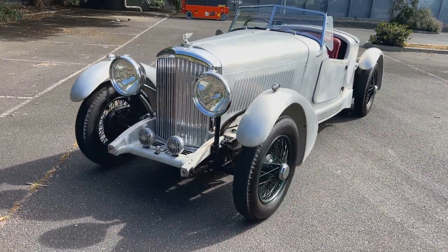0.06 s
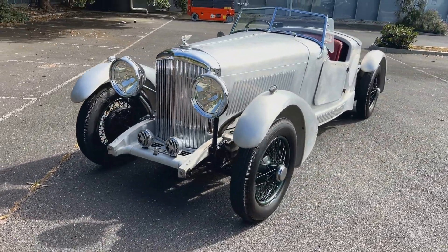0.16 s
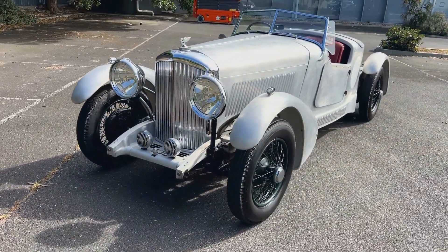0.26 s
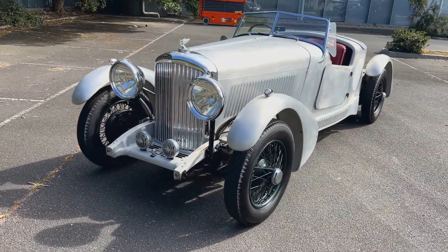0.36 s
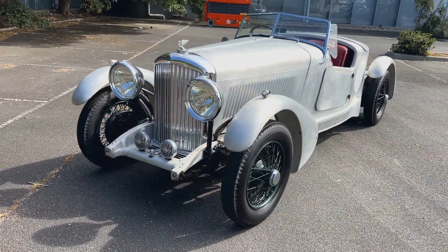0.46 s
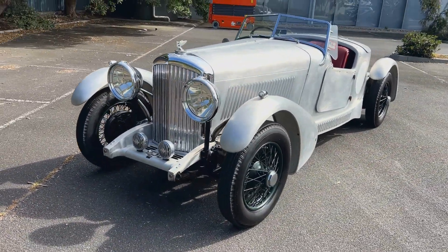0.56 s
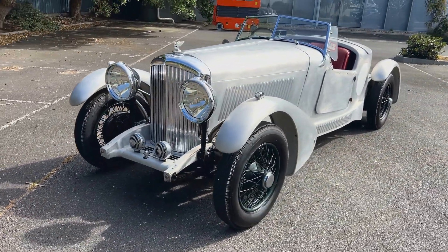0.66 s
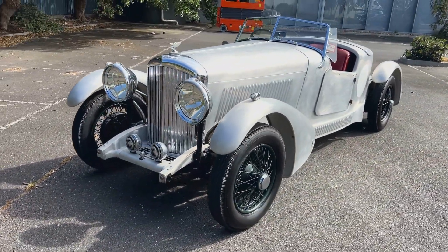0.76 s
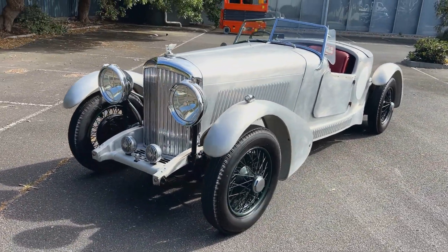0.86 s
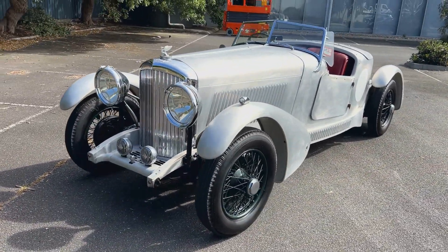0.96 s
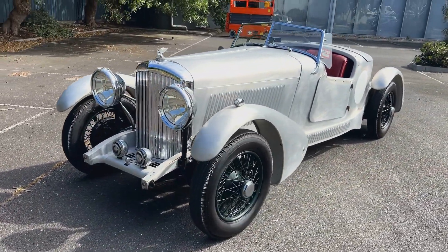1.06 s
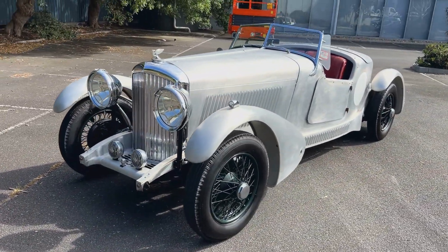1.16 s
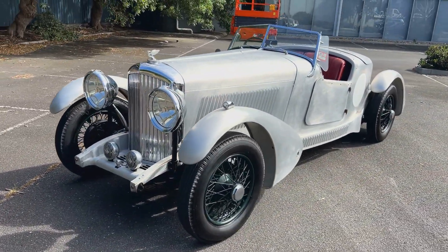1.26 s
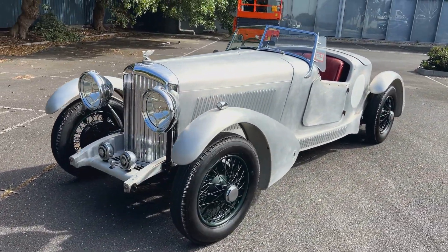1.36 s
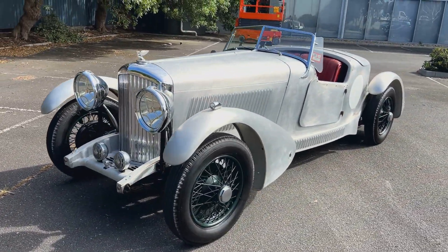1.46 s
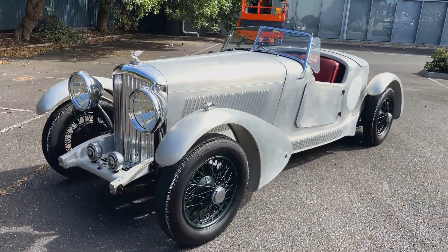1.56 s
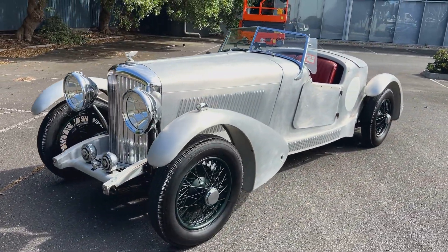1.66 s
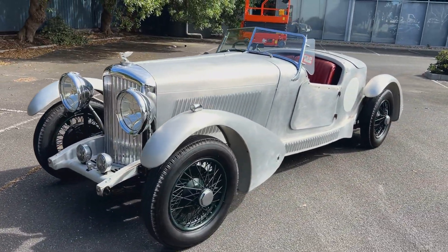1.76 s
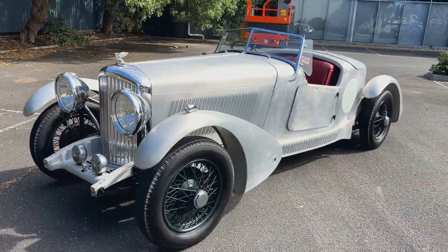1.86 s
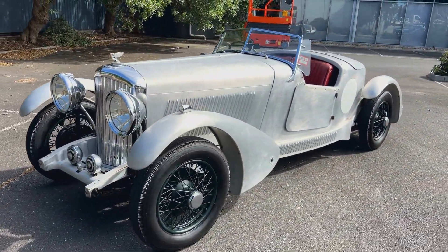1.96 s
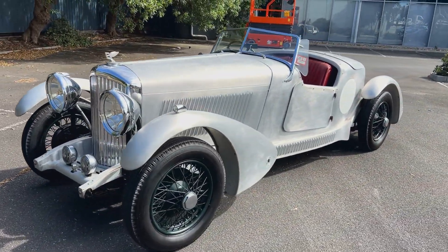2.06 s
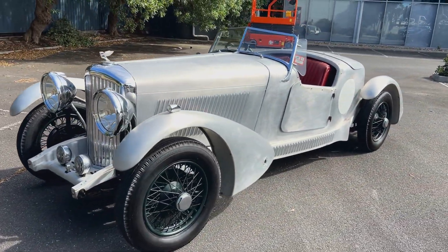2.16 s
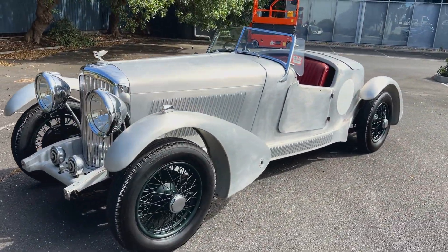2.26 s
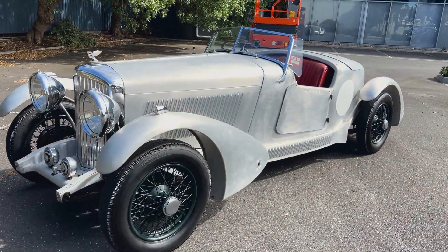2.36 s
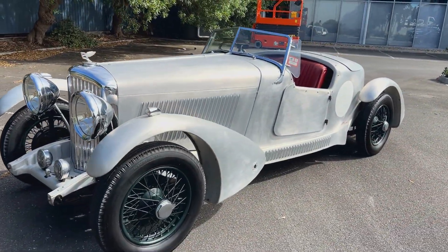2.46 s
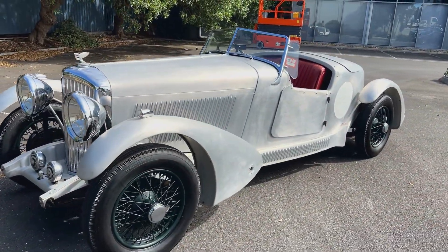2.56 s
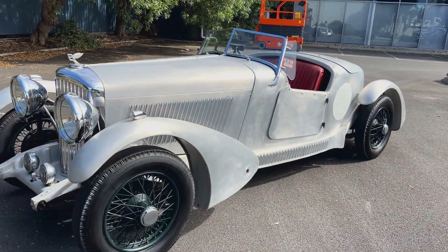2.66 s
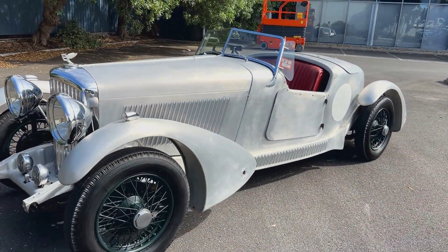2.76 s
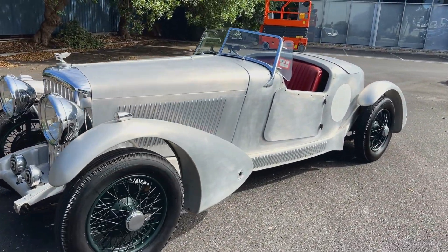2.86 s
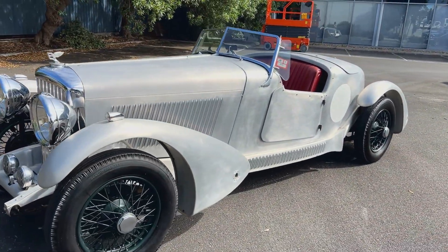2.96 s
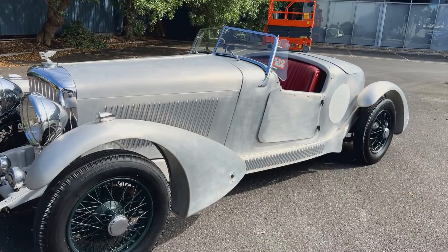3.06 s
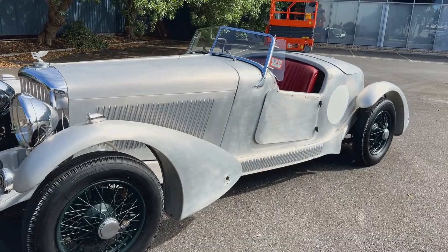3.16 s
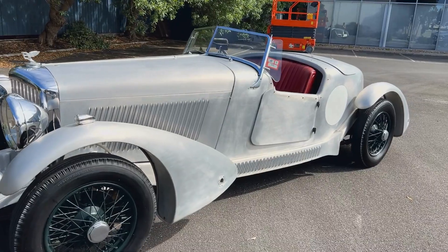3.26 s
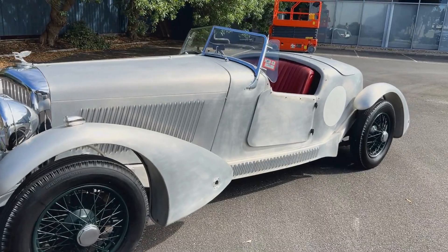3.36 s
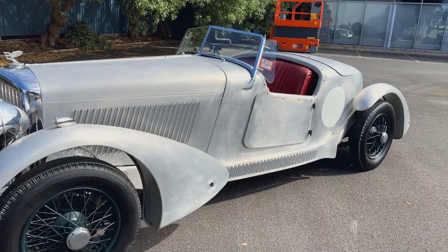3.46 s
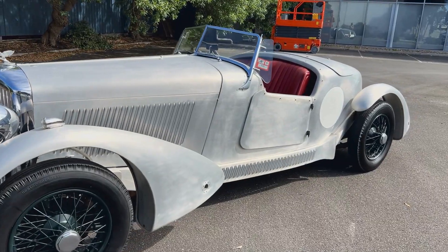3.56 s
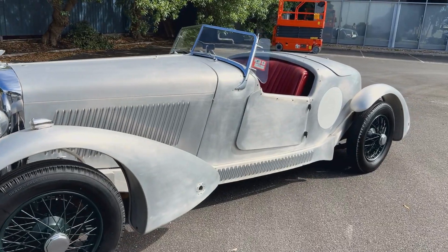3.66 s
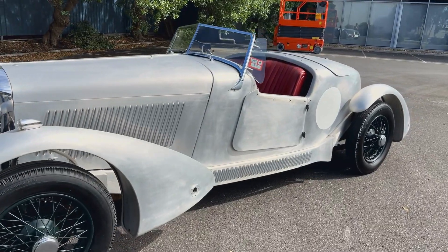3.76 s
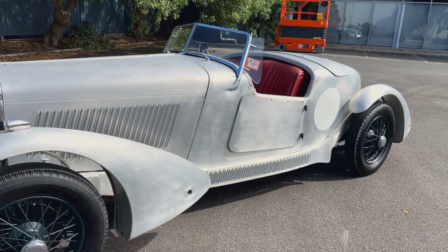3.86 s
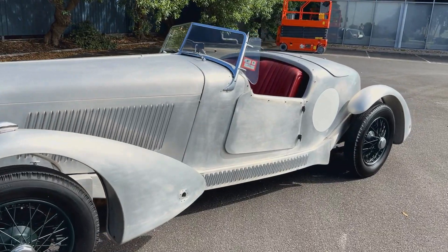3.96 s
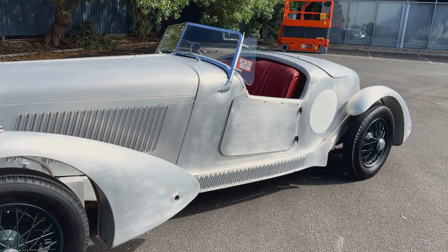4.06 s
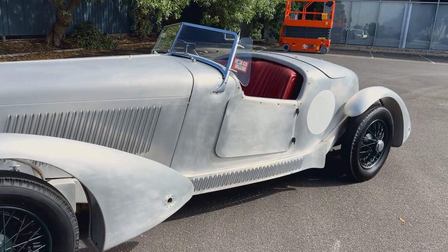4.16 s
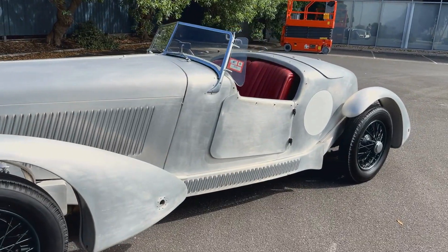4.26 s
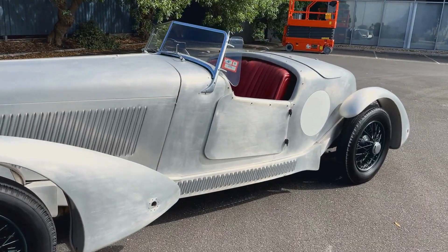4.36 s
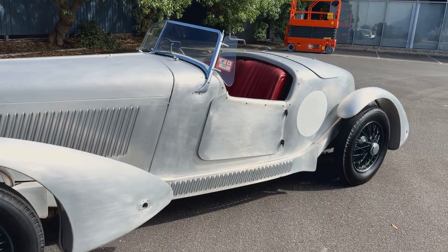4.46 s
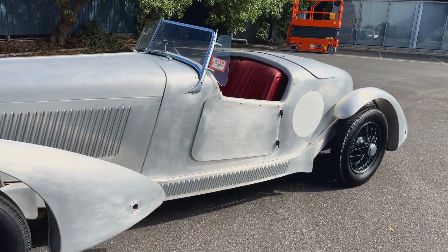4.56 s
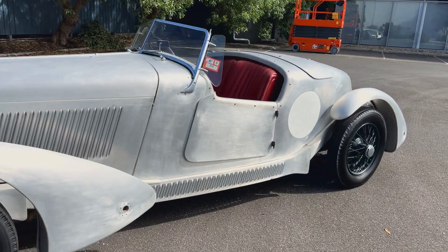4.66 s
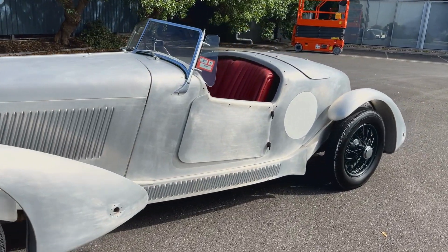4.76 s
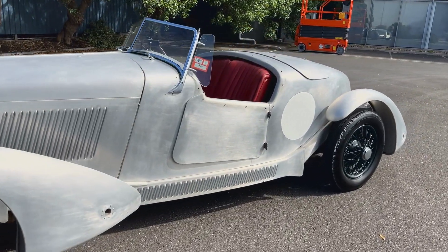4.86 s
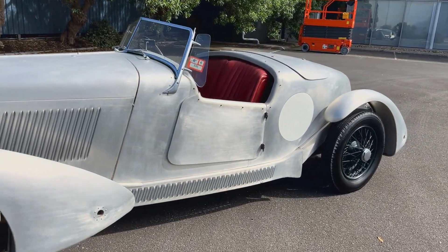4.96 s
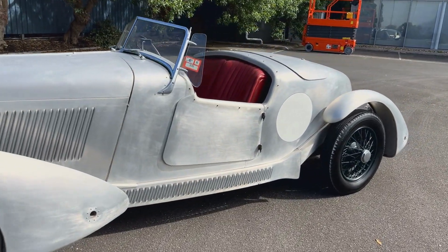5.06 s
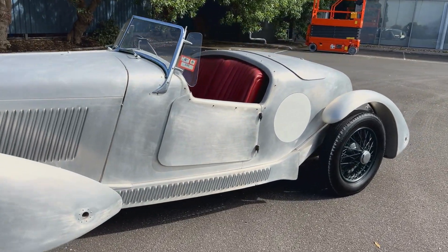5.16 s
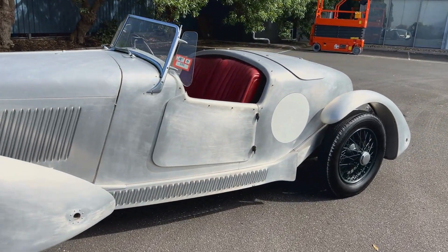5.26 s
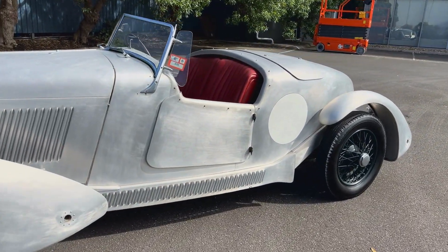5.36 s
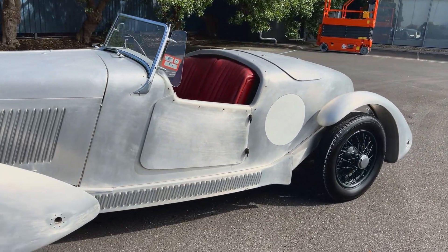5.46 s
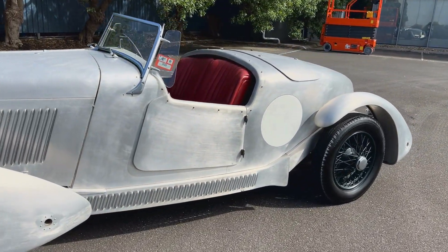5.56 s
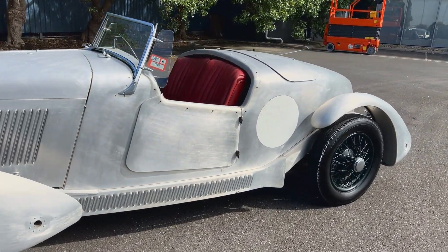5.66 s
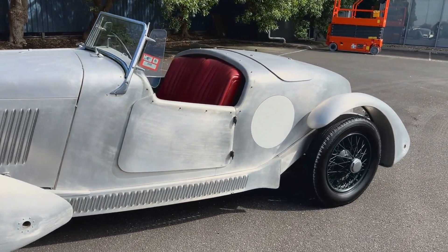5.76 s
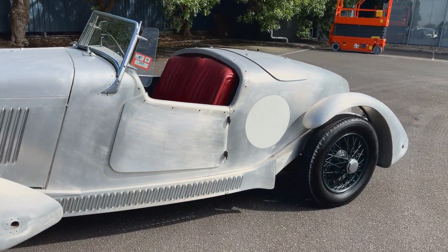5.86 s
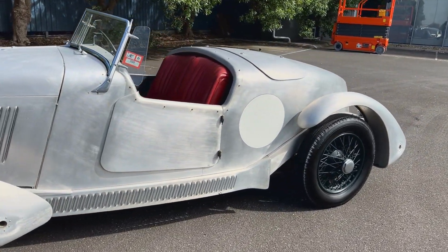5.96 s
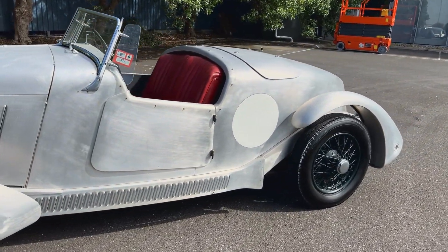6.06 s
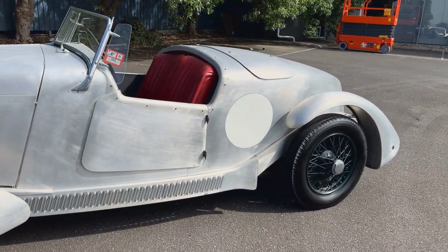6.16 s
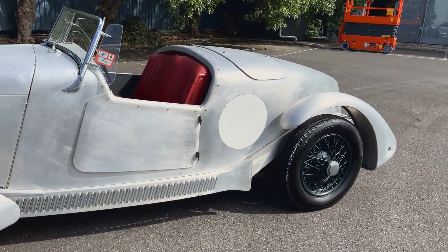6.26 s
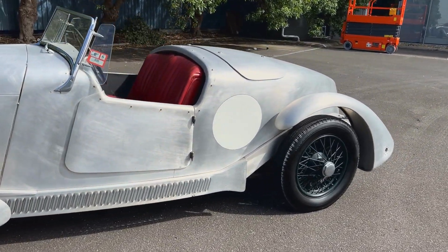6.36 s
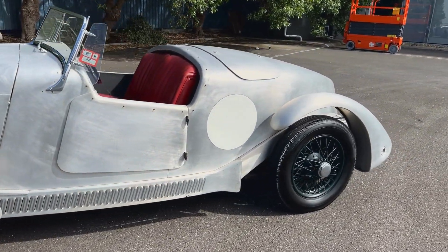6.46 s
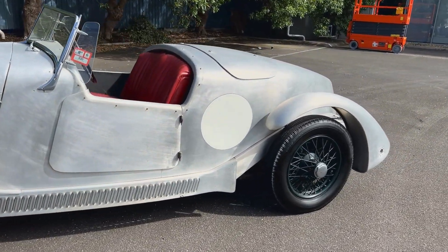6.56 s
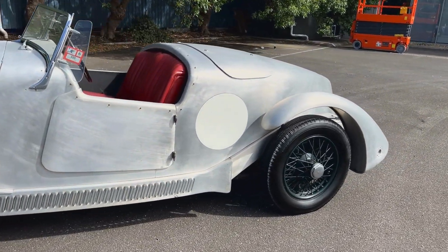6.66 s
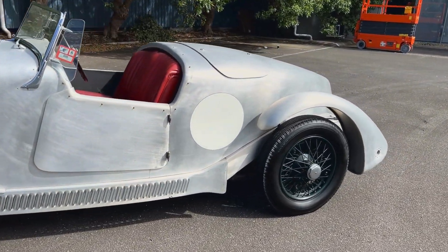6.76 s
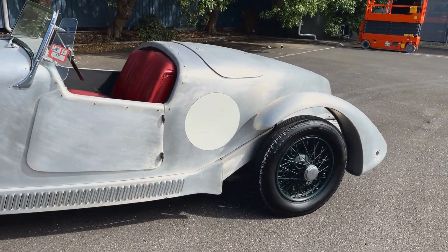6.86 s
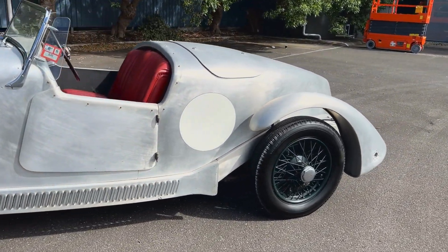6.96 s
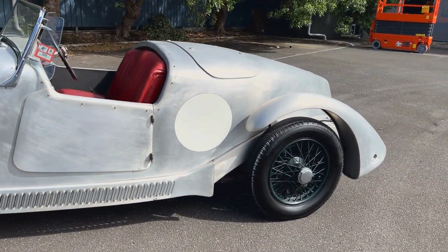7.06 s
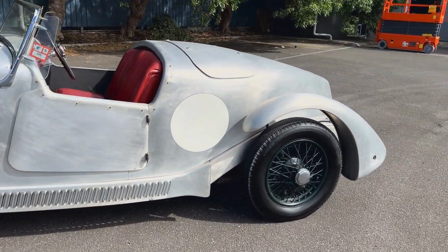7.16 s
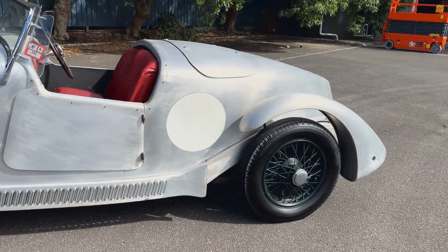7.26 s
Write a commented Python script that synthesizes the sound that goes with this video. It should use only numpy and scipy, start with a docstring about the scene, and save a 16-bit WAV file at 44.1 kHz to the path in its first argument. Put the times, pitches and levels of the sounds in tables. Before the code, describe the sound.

A large old car engine idles with a deep steady boom and light valve clatter, growing louder as it comes closer.

```python
"""An old straight-six idling in an open car park

The listener walks from the radiator towards the tail. The exhaust booms on the third harmonic of
the firing rate and now and then coughs; gas rumbles from the tailpipe and the idle hunts a little.
The valve gear clatters under the bonnet, and a small bird chirps, answered by the walls around."""
import sys
import numpy as np
from scipy import signal
from scipy.fft import rfft, irfft, next_fast_len
from scipy.io import wavfile
from scipy.ndimage import map_coordinates

SR = 44100
rng = np.random.default_rng(int(sys.argv[2]) if len(sys.argv) > 2 else 0)


def waveform_to_disk(signal):
    """Save audio, clipped to [-1, 1], as 16-bit WAV at the path in sys.argv[1]."""
    frames = np.transpose(np.atleast_2d(signal))
    scaled = np.clip(frames, -1, 1) * 32767
    samples = np.round(scaled).astype(np.int16)
    wavfile.write(sys.argv[1], SR, samples)


N = 322371
TIME = np.arange(N) / SR


def amp(db):
    """Amplitude ratio of a level in decibels."""
    return 10 ** (np.asarray(db) / 20)


def unit(x):
    """Normalisation to rms 1."""
    return x / np.sqrt(np.mean(x ** 2) + 1e-20)


def along(points, hz):
    """Interpolation of (frequency, value) points on a logarithmic frequency axis."""
    knots_hz, values = np.transpose(points)
    return np.interp(np.log(hz + 1), np.log(knots_hz + 1), values)


def curve(points):
    """Linear interpolation of (time, value) points at every sample."""
    return np.interp(TIME, *np.transpose(points))


def wobble(rate):
    """Smooth random modulation: a spline through `rate` Gaussian values a second."""
    return map_coordinates(rng.standard_normal(int(N * rate / SR) + 4), [TIME * rate])


def swells(events, sigma_s):
    """A Gaussian rise in level around each (time, level) event."""
    return sum(db * np.exp(-.5 * ((TIME - s) / sigma_s) ** 2) for s, db in events)


def filtered(x, response):
    """Linear filtering: the spectrum is multiplied by a frequency response."""
    size = next_fast_len(N + SR // 2)
    return irfft(rfft(x, size) * response(np.fft.rfftfreq(size, 1 / SR)), size)[..., :N]


def rush(spectrum, coherence):
    """Coloured stereo noise of rms 1; the ratio of mid to side sets its coherence."""
    def colour(hz):
        angle = np.arccos(np.clip(along(coherence, hz), -1, 1)) / 2
        return amp(along(spectrum, hz)) * np.array([np.cos(angle), np.sin(angle)])
    mid, side = filtered(rng.standard_normal((2, N)), colour)
    return unit(np.array([mid + side, mid - side]))


# Spectrum of the ambient noise: (frequency [Hz], relative density [dB])
AIR_SPECTRUM = [(15, -37.5), (45, -9.5), (100, -2), (300, -1), (600, -16.5), (1500, -17.5), (4000, -32),
                (9000, -39), (15000, -50.5)]

def air():
    """Ambient noise: the steady hush of the car park."""
    return amp(-57) * rush(AIR_SPECTRUM, coherence=[(100, 0.76), (2000, 1.0)])


# Chirps: (time [s], level [dB], duration [s], start pitch [Hz], end pitch [Hz], sub-octave level [dB])
CHIRPS = [(0.12, -53.5, 0.042, 4440, 6640, -2.5), (5.98, -42, 0.04, 4840, 6580, -2.5),
          (6.326, -49, 0.016, 3300, 3500, -38), (6.331, -53.5, 0.026, 4320, 4100, -25),
          (6.545, -54.5, .025, 3880, 4050, -30)]

def bird(echo_db=-2, t60_s=0.37, fifth_db=-21, octave_db=-27, spread=0.2):
    """Frequency modulation: quick sweeps level off, and scattering by walls and trees adds a tail."""
    song = np.zeros(N)
    for s, db, length_s, start_hz, end_hz, sub_db in CHIRPS:
        progress = np.clip((TIME - s) / length_s, 0, 1)
        sweep = np.minimum(progress / .8, 1) ** 1.3
        hz = (start_hz + (end_hz - start_hz) * sweep) * amp(0.25 * wobble(700))
        phase = 2 * np.pi * np.cumsum(hz) / SR
        envelope = np.abs(np.sin(np.pi * progress ** 1.24)) ** .5
        for ratio, partial_db in [(1, 0), (.5, sub_db), (1.5, fifth_db), (2, octave_db)]:
            song += amp(db + partial_db) * envelope * np.sin(ratio * phase)
    t = TIME[:SR // 2]
    ahead = rng.standard_normal(len(t))  # most of the echo is common to both ears
    scatter = ahead + spread * rng.standard_normal((2, len(t)))
    tail = scatter * amp(-60 * t / t60_s) * (1 - np.exp(-t / 0.0021))
    echoes = signal.fftconvolve(song[None], tail / np.linalg.norm(tail[0]), axes=1)[:, :N]
    return song + amp(echo_db) * echoes


# The listener's walk: (time [s], distance from the car's rear half [m])
WALK = [(0, 6.9), (1.1, 5.05), (2.6, 3.87), (3.6, 2.98), (4.2, 2.375), (5.2, 1.89), (6.2, 1.635),
        (7.3, 1.47)]

def nearing(db_at_2m, db_per_doubling):
    """Distance law: the level along the walk, falling equally with each doubling of distance."""
    return db_at_2m - db_per_doubling * np.log2(curve(WALK) / 2)


def blows(firings, offset, pattern_db, scatter_db, jitter_s):
    """Quasi-periodic impulse train: one uneven blow per firing, delayed by `offset` of a period."""
    count = np.arange(int(firings[-1]))
    size, shift = np.clip(rng.standard_normal((len(count), 2)), -2.5, 2.5).T
    times = np.interp(count + offset, firings, TIME) + jitter_s * shift
    strengths = amp(np.take(pattern_db, count, mode="wrap") + scatter_db * size)
    return np.bincount(np.clip(times * SR, 0, N - 1).astype(int), strengths, N)


def bursts(hits, rise_s, decay_s):
    """Incoherent addition: an envelope of rms 1 in which the bursts after each impulse add in power."""
    t = TIME[:SR // 8]
    shape = (1 - np.exp(-t / rise_s)) * np.exp(-t / decay_s)
    return unit(np.sqrt(np.abs(signal.fftconvolve(hits ** 2, shape ** 2)[:N])))


# Valve clatter of each cylinder in firing order: (relative level [dB])
CYLINDERS = [-9, 0.5, 3.5, 2.5, 4, 2.5]
# Spectra of the clatter and the hiss: (frequency [Hz], relative density [dB])
CLATTER_SPECTRUM = [(500, -21), (1000, -4), (1650, -6), (2000, -5.5), (2350, 2.5), (2650, -0.5),
                    (3050, -2.5), (3500, -7), (4200, -7.5), (5000, -14), (6500, -17), (9000, -34.5),
                    (15000, -47)]
HISS_SPECTRUM = [(2500, -14.5), (4500, -7.5), (6500, -1.5), (7800, 4.5), (8700, 1.5), (9500, -8.5),
                 (10200, -21.5), (11300, -2.5), (13000, -14), (15500, -13.5)]
# Left-right likeness of the engine's noise: (frequency [Hz], coherence [0-1])
ENGINE_COHERENCE = [(50, .97), (130, .6), (300, .7), (700, .62), (1400, .82), (2500, .98), (6000, .96),
                    (12000, .8)]
# Resonances of the castings and bonnet: (frequency [Hz], bandwidth [Hz], lift [dB])
CASTING_MODES = [(1630, 36, 0.5), (1676, 27, 7.5), (2380, 64, 2.5), (2965, 130, 2.5)]
# Tones of a faint whine: (frequency [Hz], level relative to the hiss [dB])
WHINE_TONES = [(9500, -17), (9701, -16.5)]

def valve_gear(firings):
    """Impact noise: clatter and tappet ticks ring the castings, over a pulsing hiss and a thin whine."""
    def castings(hz):
        return amp(sum(db / (1 + (2 * (hz - mode) / width) ** 2) for mode, width, db in CASTING_MODES))
    valves = blows(firings, offset=.12, pattern_db=CYLINDERS, scatter_db=1.3, jitter_s=.001)
    tappets = blows(firings, offset=.25, pattern_db=CYLINDERS, scatter_db=2.8, jitter_s=.002)
    swell = bursts(valves, rise_s=.005, decay_s=.011)
    ticks = amp(-11) * bursts(tappets, rise_s=.0006, decay_s=.004)
    beat = unit(np.sqrt(swell ** 2 + ticks ** 2 + amp(-2) ** 2))  # power sum with a steady floor
    impacts = beat * rush(CLATTER_SPECTRUM, ENGINE_COHERENCE)
    clatter = amp(nearing(db_at_2m=-54.5, db_per_doubling=6.76)) * unit(filtered(impacts, castings))
    hiss_db = nearing(db_at_2m=-64.5, db_per_doubling=12.5)
    hiss = amp(hiss_db + wobble(14)) * unit(beat + amp(-4.5)) * rush(HISS_SPECTRUM, ENGINE_COHERENCE)
    whine = sum(amp(hiss_db + db + 2.2 * wobble(15)) * np.sqrt(2) * np.sin(2 * np.pi * hz * TIME)
                for hz, db in WHINE_TONES)
    return clatter + hiss + whine


# Spectrum of the tailpipe's rumble: (frequency [Hz], relative density [dB])
RUMBLE_SPECTRUM = [(15, -45), (25, -20.5), (35, -10), (52, 3.5), (75, 2), (120, 0), (250, -26.5),
                   (600, -59), (3000, -120)]
# Deep chuffs of gas: (time [s], rise above the rumble [dB])
CHUFFS = [(2.79, 10), (3.05, 15), (3.22, 3), (5.03, 2), (6.17, 4.5), (6.7, 8), (6.89, 10), (7.03, 7.5)]

def rumble():
    """Flow noise: gas leaves the tailpipe in low lumps, now and then in a stronger chuff."""
    level_db = nearing(db_at_2m=-34.5, db_per_doubling=12.3) + swells(CHUFFS, sigma_s=0.044) + wobble(14)
    return amp(level_db) * rush(RUMBLE_SPECTRUM, coherence=[(40, 0.88), (80, 0.82), (160, 1.0)])


# Exhaust coughs: (time [s], level [dB], start pitch [Hz])
COUGHS = [(3.036, -26, 380), (5.198, -30, 440), (5.235, -24, 450), (5.615, -32, 280), (5.824, -31, 280),
          (6.531, -29, 320), (6.810, -14, 520), (6.978, -24, 320), (7.060, -22, 500)]

def coughs(sag=.25, peak_cycles=2.4):
    """Damped transient: an uneven firing pushes out a pop whose pitch sags as the gas slows."""
    pops, t = np.zeros(N + SR), TIME[:SR // 8]
    for s, db, start_hz in COUGHS:
        cycles = t * start_hz
        phase = 2 * np.pi * np.log1p(sag * cycles) / sag
        age = cycles / peak_cycles
        envelope = age * np.exp(1 - age) * (1 - np.exp(-2 * cycles))
        pops[round(s * SR):][:len(t)] -= amp(db) * envelope * np.sin(phase)
    return pops[:N]


# Exhaust resonances above the boom: (frequency [Hz], bandwidth [Hz],
# relative level by the radiator [dB], by the front wheel [dB], by the door [dB])
PIPE_MODES = [(127.4, 14, -5, -5.5, -4), (163, 14, -5.5, -5, -5), (202.5, 18, -5, -10, 3.5),
              (263.8, 18.4, -11, -6, -8), (301.3, 15.7, -8, -8.5, -10.5), (371, 45, -16, -19, -16),
              (442.7, 46, -32.5, -18.5, -19.5), (531, 33, -28.5, -23, -27.5)]
# Spectrum of the gas puffs: (frequency [Hz], relative density [dB])
PUFF_SPECTRUM = [(30, -45.5), (70, -12.5), (120, 3), (230, -1), (310, -5), (400, -15.5), (540, -13.5),
                 (680, -20), (900, -19), (1050, -28), (1800, -29.5), (3500, -60), (9000, -120)]

def exhaust(firings):
    """Impulse excitation: each firing rings the pipe's damped modes and lets out a puff of gas."""
    pulses = blows(firings, offset=.85, pattern_db=[0], scatter_db=1.5, jitter_s=.0001)
    pipe_db = nearing(db_at_2m=-36.5, db_per_doubling=7.15)
    modes, t = np.zeros(N), TIME[:SR // 4]
    for hz, width_hz, *place_db in PIPE_MODES:
        ring = np.sin(2 * np.pi * hz * t) * np.exp(-np.pi * width_hz * t) * (1 - np.exp(-t / 0.0038))
        mode_db = np.interp(TIME, [0, TIME[-1] / 2, TIME[-1]], place_db)  # the mix shifts along the car
        waver = amp(2 * wobble(3))
        modes += amp(pipe_db + mode_db) * unit(waver * signal.fftconvolve(pulses, ring)[:N])
    puffs = bursts(pulses, rise_s=.0015, decay_s=.028) * rush(PUFF_SPECTRUM, ENGINE_COHERENCE)
    return modes + amp(nearing(db_at_2m=-41, db_per_doubling=8)) * puffs


# Runs of weak firings, in which the boom sags: (time [s], depth [dB])
STUMBLES = [(1.64, 5), (2.57, 6), (2.8, 6), (3.3, 4), (3.74, 3), (4.86, 0.5), (6.92, 3.5)]

def drone(firings, slowing_hz, right_lead_rad=0.21, flutter_db=0.9, cycle_db=0.07, lope_db_per_hz=1.2):
    """Harmonics of the firing rate: a boom, a throb below and an octave above, in uneven combustion."""
    def harmonic(order, roughness, rate):
        sidebands = roughness * (wobble(rate) + 1j * wobble(rate))
        return np.exp(2j * np.pi * order * firings) * (1 + sidebands)
    engine_cycle = np.sin(2 * np.pi * firings / len(CYLINDERS))
    uneven_db = cycle_db * engine_cycle + flutter_db * wobble(16) - swells(STUMBLES, sigma_s=0.036)
    boom_db = nearing(db_at_2m=-18.5, db_per_doubling=8.74) + uneven_db
    throb_db = nearing(db_at_2m=-35, db_per_doubling=7.2) + lope_db_per_hz * slowing_hz
    octave_db = nearing(db_at_2m=-42, db_per_doubling=8.6)
    boom = amp(boom_db) * harmonic(order=3, roughness=0.069, rate=36)
    throb = amp(throb_db) * harmonic(order=2, roughness=0.096, rate=6.7)
    octave = amp(octave_db) * harmonic(order=6, roughness=.25, rate=14)
    ears = np.exp(1j * right_lead_rad * np.array([[-.5], [.5]])) * amp([[.25], [-.25]])
    return np.sqrt(2) * np.real(ears * (boom + throb + octave))


# The idle hunting around its set speed: (time [s], boom frequency [Hz])
IDLE = [(0.0, 97.7), (0.54, 101.2), (1.06, 99.3), (1.7, 102.8), (1.86, 101.8), (2.12, 97.9), (2.66, 102.3),
        (2.8, 98.0), (3.4, 100.6), (3.56, 98.3), (3.89, 102.0), (4.21, 98.7), (4.53, 99.0), (4.85, 103.4),
        (5.27, 100.7), (5.53, 101.9), (5.63, 100.3), (6.45, 102.7), (6.67, 101.1), (6.81, 103.3),
        (6.91, 98.6), (7.31, 99.3)]

def scene():
    """Superposition: one count of firings times the drone, pipe and valves, heard with bird and air."""
    boom_hz = curve(IDLE)
    firings = np.cumsum(boom_hz / 3) / SR  # the boom is the third harmonic
    slowing_hz = boom_hz.mean() - boom_hz
    tailpipe = drone(firings, slowing_hz) + exhaust(firings) + rumble() + coughs()
    return tailpipe + valve_gear(firings) + bird() + air()


def record(dry, fade_s=.01, low_hz=22, top_hz=15720):
    """Band limiting: after a brief fade-in, the deepest bass and the highest treble are removed."""
    faded = dry * np.minimum(TIME / fade_s, 1)
    thinned = signal.sosfilt(signal.butter(2, low_hz, "highpass", fs=SR, output="sos"), faded)
    return filtered(thinned, lambda hz: hz < top_hz)


dry = scene()
out = record(dry)
waveform_to_disk(out)
```